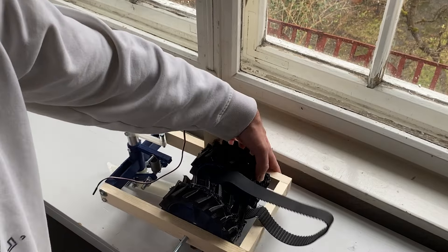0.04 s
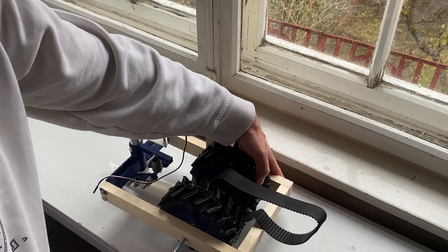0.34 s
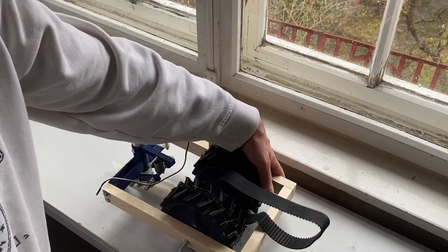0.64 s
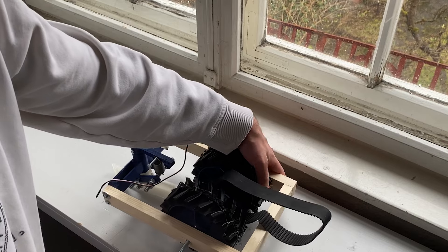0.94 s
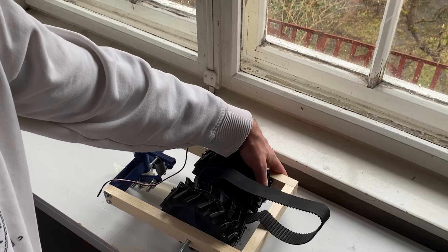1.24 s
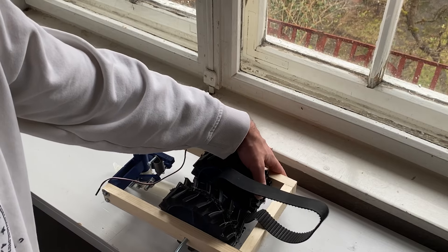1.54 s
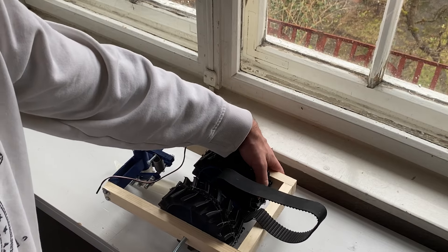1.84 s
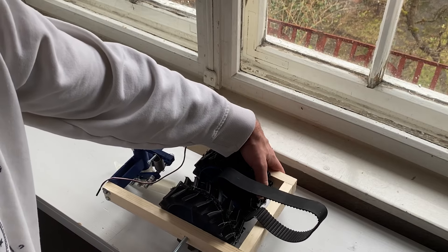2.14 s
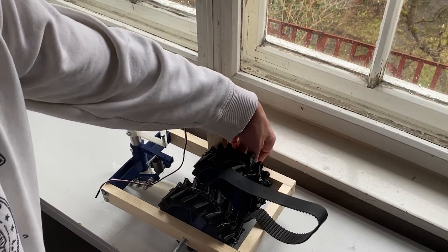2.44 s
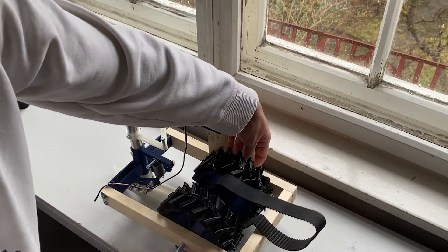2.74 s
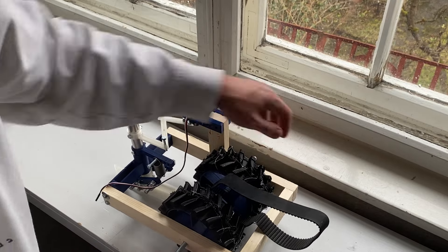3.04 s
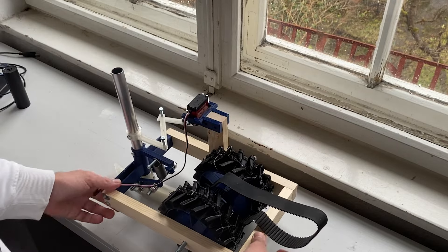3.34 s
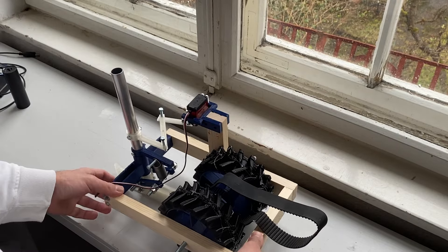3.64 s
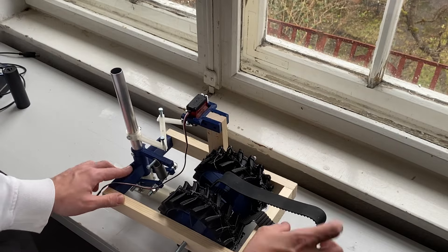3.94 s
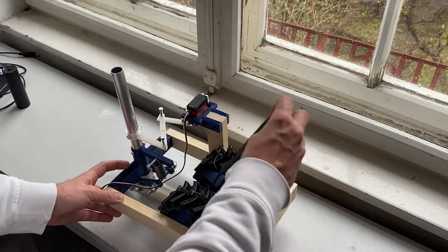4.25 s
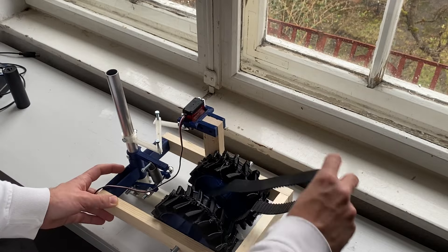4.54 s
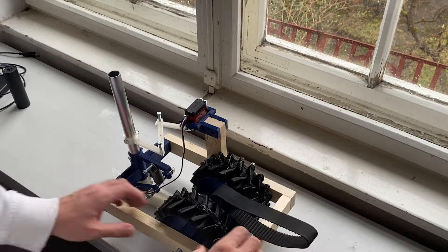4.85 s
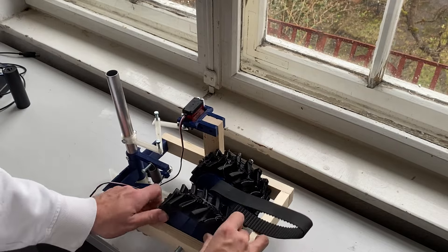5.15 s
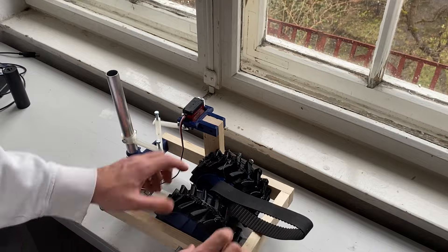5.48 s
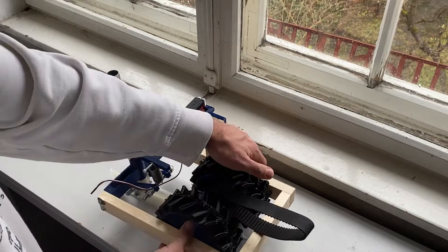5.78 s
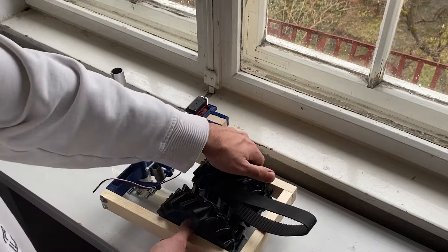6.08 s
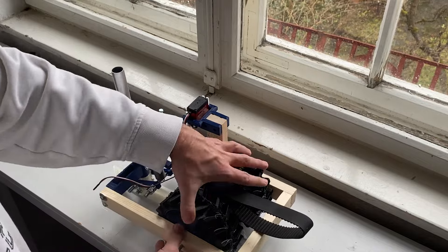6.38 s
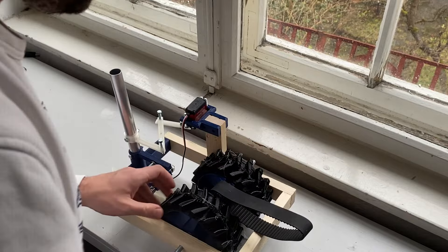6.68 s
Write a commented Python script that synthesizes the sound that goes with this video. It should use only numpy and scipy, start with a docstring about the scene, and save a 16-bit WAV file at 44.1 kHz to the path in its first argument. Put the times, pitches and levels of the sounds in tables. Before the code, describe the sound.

Plastic paddle wheels are handled in a wooden frame, heard close in a quiet room with a faint low rumble. For the first two seconds there are light, irregular clicks, knocks and brief rubs. At about 2 seconds a wheel is dragged against the wood in a rough scrape, ending in two knocks at 2.3 seconds. It snaps free with a loud, sharp clack at 2.5 seconds and rubs again near 2.9. A quieter stretch holds soft bumps and a faint sleeve brush. From 4.2 to 4.8 seconds a rubber belt is lifted and dropped with light taps, and tiny, faint high squeaks come and go until 6 seconds. Firm knocks land at 5.2 and 5.8 seconds, then a loud, duller rub at 5.9. Cloth swishes softly while a few more rubs and clicks fade out by about 6.8 seconds.

```python
"""Plastic paddles rub and knock on a wooden frame as hands work two paddle wheels on a table.
One wheel is dragged round in a long scrape and snaps free, a toothed rubber belt is lifted and
dropped, rubber and skin squeak on plastic, and a sleeve brushes past in the quiet room.
Blows and stick-slip friction all ring the same modes of wheels and frame, coloured by the spot
touched. Squeaks, sleeve and room are shaped noise."""
import sys
import numpy as np
from scipy import signal
from scipy.io import wavfile

SR = 44100
rng = np.random.default_rng(int(sys.argv[2]) if len(sys.argv) > 2 else 0)


def to_wav(s):
    """Save 16-bit WAV."""
    ch = np.atleast_2d(s).T  # columns
    pcm = np.round(np.clip(ch, -1, 1) * 32767)  # PCM
    wavfile.write(sys.argv[1], SR, pcm.astype(np.int16))


N = 300585
TIME = np.arange(N) / SR
TAIL = int(.3 * SR)
RING_TIME = np.arange(TAIL) / SR
EDGES_HZ = np.geomspace(22, 17000, 20)
CENTRES_HZ = np.sqrt(EDGES_HZ[1:] * EDGES_HZ[:-1])


def from_db(db):
    """Decibels to gain."""
    return 10 ** (np.asarray(db) / 20)


def unit_energy(x):
    """Scale to a mean energy of one per channel."""
    return x / np.sqrt(np.mean(np.sum(x ** 2, axis=-1)) + 1e-30)


def at_hz(points, hz):
    """Interpolate a curve on a log-frequency axis."""
    f, value = np.transpose(points)
    return np.interp(np.log(hz), np.log(f), value)


def decay(t, t60):
    """Fall of 60 dB in t60 seconds, 1 ms at the shortest."""
    return np.exp(-np.log(1000) * t / max(t60, 1e-3))


def panned(db):
    """Stereo gains for a level of left over right."""
    return from_db([[db / 2], [-db / 2]])


def add(out, start_s, sound):
    """Mix in a stereo sound."""
    i = max(int(start_s * SR), 0)
    out[:, i:i + sound.shape[1]] += sound[:, :N - i]


def resonate(x, hz, width_hz):
    """Two-pole resonance with a peak gain of one."""
    r = np.exp(-np.pi * width_hz / SR)
    feedback = [1, -2 * r * np.cos(2 * np.pi * hz / SR), r * r]
    return signal.lfilter(np.array([1, 0, -1]) * (1 - r * r) / 2, feedback, x)


def swells(rows):
    """Sum of bell-shaped envelopes."""
    return sum(from_db(db) * np.exp(-np.minimum((2 * (TIME - centre_s) / width_s) ** 2, 50))
               for centre_s, width_s, db in rows)


# Stereo image. Each row: frequency in Hz, left-right correlation.
CORRELATION = [(100, .99), (500, .96), (1000, .62), (2000, .45), (4000, .62), (8000, .74), (15000, .66)]

def noise_bands():
    """Half-octave bands of stereo noise, nearly mono in the bass."""
    white, bands = rng.standard_normal((2, 2, N)), []
    for k, hz in enumerate(CENTRES_HZ):
        bandpass = signal.butter(2, EDGES_HZ[k:k + 2], "band", fs=SR, output="sos")
        mid, side = signal.sosfilt(bandpass, white[k % 2])
        alike = at_hz(CORRELATION, hz)
        bands.append(np.sqrt(1 + alike) * mid + np.sqrt(1 - alike) * side * [[1], [-1]])
    return np.array(bands)


def coloured_noise(bands, spectrum):
    """Steady noise of a given spectrum, rms one."""
    gains = from_db(at_hz(spectrum, CENTRES_HZ))
    return unit_energy(np.tensordot(gains, bands, 1)) * np.sqrt(N)


# Room noise spectra. Each row: frequency in Hz, relative density in dB.
RUMBLE_SPECTRUM = [(26, -28), (52, -31), (82, -30), (122, -12), (166, 8.5), (255, -8), (410, -5),
                   (610, -26), (1210, -48.5)]
RUSTLE_SPECTRUM = [(260, -19.5), (510, 7.5), (910, 6), (1510, 2), (2510, -8), (4010, -13), (8010, -43)]
# Frame shifting on the table. Each row: centre in seconds, width in seconds, level in dB.
FRAME_SHIFTS = [(1.6, .08, -62), (2.9, 1.7, -77.5), (6.2, 0.22, -71)]

def room(bands, rumble_db=-71.5, rustle_db=-78.5, rumble_pan_db=-1.3):
    """A faint steady rustle over a low rumble that swells as the frame shifts."""
    envelope = from_db(rumble_db) + swells(FRAME_SHIFTS)
    rumble = envelope * coloured_noise(bands, RUMBLE_SPECTRUM) * panned(rumble_pan_db)
    return rumble + from_db(rustle_db) * coloured_noise(bands, RUSTLE_SPECTRUM)


# Cloth spectrum. Each row: frequency in Hz, relative density in dB.
SLEEVE_SPECTRUM = [(1600, -15.5), (3100, -7), (6400, -0.5), (9100, -2), (12100, -3.5), (14100, -27),
                   (15900, -21.5)]
# Sleeve passes. Each row: centre in seconds, width in seconds, level in dB.
SLEEVE_SWEEPS = [(1.42, 0.58, -82.5), (3.346, .1, -70), (4.47, 0.19, -90), (5.47, 0.14, -81.5),
                 (5.76, 0.19, -77), (6.09, 0.12, -78.5), (6.64, 0.18, -82)]

def sleeve(bands, floor_db=-91.0):
    """Cloth brushes past in swells of a faint steady hiss."""
    return (from_db(floor_db) + swells(SLEEVE_SWEEPS)) * coloured_noise(bands, SLEEVE_SPECTRUM)


# Squeak resonances. Each row: frequency in Hz, relative level in dB.
SQUEAK_TONES = [(7750, 9), (4830, 0)]
# Squeaks. Each row: centre in seconds, width in seconds, gain in dB.
SQUEAKS = [(4.757, 0.033, -70.5), (4.79, 0.035, -72.5), (4.96, 0.053, -80), (5.025, 0.019, -73.5),
           (5.246, .016, -74.5), (5.51, 0.033, -79.5), (6.037, 0.018, -71.5)]

def squeaks(width_hz=850, hiss_db=4.0, hiss_from_hz=4000):
    """Rubber and skin squeak thinly on smooth plastic, with a hiss of sliding."""
    slip = rng.standard_normal((2, N))
    whistle = sum(from_db(db) * unit_energy(resonate(resonate(slip, hz, width_hz), hz, width_hz))
                  for hz, db in SQUEAK_TONES)
    highpass = signal.butter(2, hiss_from_hz, "high", fs=SR, output="sos")
    hiss = unit_energy(signal.sosfilt(highpass, slip))
    return swells(SQUEAKS) * (whistle + from_db(hiss_db) * hiss) * np.sqrt(N)


# Modes of wheels and frame. Each row: frequency in Hz, relative energy in dB, t60 in seconds.
BODY_MODES = [(168.1, -2, .19), (214.2, 0, 0.14), (287, -3.5, 0.19), (358.3, -6.5, 0.12), (416, 2.5, 0.063),
              (741, 1, 0.097), (836.5, -1, .085), (902.3, 3, 0.084), (1012, 0.5, 0.035),
              (1280, -3.5, 0.063), (1171, -14, 0.031), (1396, 3.5, 0.092), (1592, 1.5, 0.025),
              (1778, -0.5, 0.058), (1957.6, -12.5, 0.16), (2160, -9.5, .085), (2125, -4.5, .055),
              (3390, -1, 0.011), (3745, -7, 0.05), (3900, -5, 0.017), (4077, 0, 0.039), (4813, -2, 0.029),
              (4576, -6.5, .055), (5600, -15.5, .045), (7550, -9, 0.047)]
# Dense weak modes and close reflections. Each row: frequency in Hz, relative density in dB.
DIFFUSE_SPECTRUM = [(81, -26), (161, 2), (301, 5), (551, -16.5), (901, 5.5), (1801, -0.5), (2701, -3),
                    (4501, -2), (7001, -4.5), (11001, 0), (15001, -1)]
# Their decay. Each row: frequency in Hz, t60 in seconds.
DIFFUSE_T60 = [(110, 0.19), (410, 0.49), (1100, 0.033), (2900, 0.098), (7100, 0.048), (14000, 0.017)]

def body_responses(bands, count=24, crack_db=-3.0, crack_t60=0.0091, scatter_db=2.5,
                   room_db=-27, room_t60=.28):
    """Impulse responses at random points of the assembly: clear modes, a diffuse ring and a crack."""
    t, responses = RING_TIME, []
    hz, mode_db, _ = np.transpose(BODY_MODES)
    modes = np.array([unit_energy(decay(t, t60)) * np.exp(2j * np.pi * f * t)
                      for f, _, t60 in BODY_MODES])
    room_tail = from_db(room_db) * decay(t, room_t60)
    envelopes = np.array([unit_energy(decay(t, at_hz(DIFFUSE_T60, f)) + room_tail) for f in CENTRES_HZ])
    colour = from_db(at_hz(DIFFUSE_SPECTRUM, CENTRES_HZ))
    spread_rad = np.arccos(at_hz(CORRELATION, hz)) / 2   # higher modes reach the sides out of phase
    for _ in range(count):
        i = rng.integers(TAIL, N - TAIL)
        noise = bands[:, :, i:i + TAIL]
        diffuse = unit_energy(np.einsum("bct,bt->ct", noise, envelopes * colour[:, None]))
        crack = unit_energy(np.tensordot(colour, noise, 1) * decay(t, crack_t60))
        phase = rng.uniform(0, 2 * np.pi, len(hz))
        phase = phase + spread_rad * rng.choice([-1, 1], len(hz)) * [[1], [-1]]
        gains = from_db(mode_db + scatter_db * rng.standard_normal(len(hz)))
        ring = unit_energy(((gains * np.exp(1j * phase)) @ modes).real)
        responses.append(ring + diffuse + from_db(crack_db) * crack)
    return np.array(responses)


# Registers: thud (frame and table), clack (paddles), tick (their edges), fizz (surface grain).
# Each row: lower edge in Hz, upper edge in Hz.
REGISTERS_HZ = [(90, 550), (550, 2200), (2200, 7000), (7000, 16000)]
# Each entry: left over right in dB for one register.
REGISTER_PANS_DB = [-1.3, -.8, -.5, 2.5]
# Contact spots. Each row: frame resonance in Hz, paddle resonance in Hz, gain of both in dB,
# grip t60 for a knock in seconds, thud over clack in dB, fizz over tick in dB.
SPOTS = {"tip": (219.5, 1679.5, 2.5, .15, -16, -6.5), "rim": (279, 849, 14.5, 2.3, -13.5, -8.5),
         "paddle": (214.5, 970, 2, 1.7, -9, -7), "wheel": (233, 900.5, 3.5, 1.5, -3.5, -7.5),
         "hub": (213.5, 960, 2, 8, 1.5, -9), "frame": (179.5, 786, 6.5, 2, 12, 1.5),
         "rail": (390, 1264, 6, .11, 3, -9), "bracket": (495, 610, 7, -0.1, 12.5, 6),
         "belt": (340, 1400, 2.5, 1, -7.5, -14), "axle": (352, 1005, 5.5, 3.3, -11.5, -12)}

def contact(ring, length_s, level_db, hardness_db, spot, corner_hz=16020, db_per_octave=8):
    """Colour a ring by spot. Level sets the clack; hardness sets tick over clack and the treble corner."""
    frame_hz, paddle_hz, resonance_db, _, thud_db, fizz_db = SPOTS[spot]
    pole = np.exp(-2 * np.pi * corner_hz * 2 ** (hardness_db / db_per_octave) / SR)
    ring = signal.lfilter([1 - pole], [1, -pole], ring + 1e-18)
    resonances = resonate(ring, frame_hz, width_hz=63) + resonate(ring, paddle_hz, width_hz=110)
    ring = ring + from_db(resonance_db) * resonances
    levels_db = level_db + np.array([thud_db, 0, hardness_db, hardness_db + fizz_db])
    sound = 0
    for db, pan_db, band_hz in zip(levels_db, REGISTER_PANS_DB, REGISTERS_HZ):
        bandpass = signal.butter(4, band_hz, "band", fs=SR, output="sos")
        sound += from_db(db) * panned(pan_db) * unit_energy(signal.sosfilt(bandpass, ring))
    return np.sqrt(length_s * SR) * sound   # levels are rms over length_s


def grip(spot, looseness=1):
    """A hand on the part cuts its ring short."""
    return decay(RING_TIME, looseness * SPOTS[spot][3])


def stroke_time(length_s):
    """Time axis of one stroke, 10 ms at the shortest."""
    return np.arange(int(np.clip(length_s * SR, SR / 100, TAIL))) / SR


def friction(pressure_db, slips_per_s=2300, uneven_db=2.0):
    """Stick and slip: tiny uneven jerks whose size follows the pressure."""
    chance, size, sign = rng.random((3, TAIL))[:, :len(pressure_db)]
    size_db = uneven_db * np.minimum(-np.log(1 - size), np.e)
    jerks = from_db(size_db) * np.sign(sign - .5)
    return jerks * (chance < slips_per_s / SR) * from_db(pressure_db)


def sliding(responses, force):
    """The contact crosses three random points, so the ring changes as it goes."""
    points = rng.permutation(len(responses))[:3]
    position = np.linspace(0, 2, len(force))
    shares = [np.sqrt(np.maximum(1 - np.abs(position - k), 0)) for k in range(3)]
    return sum(signal.fftconvolve(responses[point], (force * share)[None])
               for point, share in zip(points, shares))


# Blows. Each row: start in seconds, level in dB, hardness in dB, spot.
KNOCKS = [(0.131, -63, -6.5, "rim"), (0.237, -62, -10.5, "paddle"), (0.373, -50, -17, "tip"),
          (0.655, -76, 1, "wheel"), (0.679, -63, -5, "paddle"), (0.748, -78, 2, "belt"),
          (0.771, -65.5, -6.5, "paddle"), (0.856, -83, 4.5, "paddle"), (1.066, -79, -0.5, "paddle"),
          (1.196, -54, -25, "wheel"), (1.504, -54.5, -6.5, "hub"), (1.98, -68.5, 6, "hub"),
          (2.3, -46, 0, "paddle"), (2.313, -47, 1, "hub"), (2.553, -39.5, 5, "tip"),
          (2.674, -67, -3.5, "hub"), (3.074, -77.5, -19, "frame"), (3.19, -77.5, -20, "frame"),
          (3.712, -62, -36, "frame"), (4.162, -66.5, -12.5, "belt"), (4.242, -69, -5.5, "belt"),
          (4.282, -58, -3.5, "belt"), (4.316, -56, -4.5, "belt"), (4.396, -58, 0, "belt"),
          (4.564, -63.5, -2.5, "tip"), (5.169, -42.5, -9.5, "axle"), (5.322, -67, -11, "hub"),
          (5.79, -45, -10, "axle"), (6.448, -60, 4, "tip"), (6.457, -58.5, -7, "paddle"),
          (6.499, -70.5, -7, "belt"), (6.557, -68.5, -16.5, "bracket"), (6.667, -75, -7, "frame"),
          (6.778, -73, -22, "bracket")]

def knocks(responses, chatter_s=.016, chatter_db=-8.0, settled_db=-29.5):
    """Single blows with a brief chatter as the parts settle."""
    out = np.zeros((2, N))
    pressure_db = np.interp(stroke_time(chatter_s), [0, chatter_s], [chatter_db, settled_db])
    for k, (start_s, level_db, hardness_db, spot) in enumerate(KNOCKS):
        force = friction(pressure_db)
        force[0] = 1   # the blow itself
        ring = signal.fftconvolve(responses[k % len(responses)] * grip(spot), force[None])
        add(out, start_s, contact(ring, .03, level_db, hardness_db, spot))
    return out


# Short slides. Each row: start, rise and fall in seconds, level in dB, hardness in dB, spot.
RUBS = [(0.063, 0.039, .03, -56.5, -20, "paddle"), (0.247, 0.014, .007, -58, -3, "wheel"),
        (0.346, 0.022, 0.022, -56, 1, "tip"), (0.421, 0.0012, 0.093, -69, 0, "wheel"),
        (0.52, 0.034, 0.02, -64.5, -10, "hub"), (0.676, 0.0071, 0.025, -57, -10, "hub"),
        (0.851, 0.038, 0.0061, -68, -14.5, "wheel"), (1.089, 0.015, 0.043, -70, -9.5, "hub"),
        (1.199, 0.0037, 0.025, -50, -25.5, "wheel"), (1.28, 0.021, 0.0097, -62, -14.5, "hub"),
        (1.358, 0.0043, 0.016, -73, 5, "paddle"), (1.368, 0.031, 0.027, -62, -12.5, "wheel"),
        (1.46, .054, 0.023, -58, -12.5, "rim"), (1.578, .011, .026, -47, -6.5, "hub"),
        (1.742, 0.0042, 0.025, -56.5, -3, "wheel"), (1.795, .018, 0.035, -55.5, 2, "hub"),
        (1.948, .002, 0.023, -66, 4.5, "wheel"), (2.33, 0.0054, 0.021, -54.5, -9, "hub"),
        (2.428, 0.0051, 0.045, -57, -13, "paddle"), (2.492, .012, 0.017, -57.5, -15, "paddle"),
        (2.523, 0.015, 0.025, -35, 0, "tip"), (2.7, 0.016, 0.067, -58.5, -16.5, "wheel"),
        (2.83, 0.013, 0.015, -72, -2, "paddle"), (2.857, 0.011, 0.056, -56.5, 1, "wheel"),
        (2.893, 0.026, .029, -44.5, -5.5, "wheel"), (3.358, 0.037, 0.018, -59, -16, "wheel"),
        (3.519, 0.0058, 0.016, -56, -39, "paddle"), (3.573, 0.0082, 0.029, -65.5, -35, "hub"),
        (3.63, 0.023, .04, -77, -33, "frame"), (3.982, .012, .011, -50.5, -22, "rail"),
        (4.201, 0.0079, 0.036, -66, -19, "wheel"), (4.341, 0.062, 0.035, -67.5, -6.5, "belt"),
        (4.535, .033, 0.0087, -60, -26, "paddle"), (4.629, .01, 0.035, -58.5, -14.5, "wheel"),
        (4.7, .014, 0.016, -61.5, -3, "tip"), (4.735, 0.0062, 0.063, -60, -5.5, "belt"),
        (5.049, 0.061, 0.014, -53, -8, "paddle"), (5.188, 0.018, 0.015, -53, -14, "wheel"),
        (5.524, 0.0037, 0.024, -56, -22.5, "rail"), (5.686, 0.0084, 0.021, -72, -0.5, "frame"),
        (5.832, .01, 0.016, -61, -7, "wheel"), (5.858, .003, 0.044, -48.5, -19, "rim"),
        (5.883, .006, .022, -34.5, -21.5, "rim"), (5.965, .033, 0.021, -48.5, -15, "paddle"),
        (6.131, 0.025, 0.044, -56, -12, "paddle"), (6.214, 0.028, 0.014, -56.5, -14.5, "paddle"),
        (6.433, 0.021, 0.025, -50, -14, "paddle")]

def rubs(responses, graze_share=.4, graze_db=-41.0, light_db=-13.0):
    """Paddles and fingers graze the surface, then slide briefly, pressing harder and letting go."""
    out = np.zeros((2, N))
    for start_s, rise_s, fall_s, level_db, hardness_db, spot in RUBS:
        graze_s, length_s = graze_share * rise_s, rise_s + fall_s
        t = stroke_time(graze_s + length_s) - graze_s
        pressure_db = np.interp(t, [-graze_s, 0, rise_s, length_s], [graze_db, light_db, 0, light_db])
        ring = sliding(responses * grip(spot, looseness=3.3), friction(pressure_db))
        add(out, start_s - graze_s, contact(ring, length_s, level_db, hardness_db, spot))
    return out


# The long scrape, paddle after paddle.
# Each row: start, length and rise in seconds, level in dB, hardness in dB, spot.
SCRAPE_STROKES = [(1.975, 0.2, 0.054, -47, 0.5, "wheel"), (2.174, .162, 0.0059, -43, -1, "paddle")]

def scrape(responses, light_db=-10.0, bite_db=3.5, release_s=0.012,
           waver_db=1.5, wavers_per_s=45, grip_t60=0.49):
    """A wheel is dragged round: each paddle bites the wood, eases off unevenly and slips free."""
    out = np.zeros((2, N))
    damped = responses * decay(RING_TIME, grip_t60)
    for start_s, length_s, rise_s, level_db, hardness_db, spot in SCRAPE_STROKES:
        t, waver = stroke_time(length_s), rng.standard_normal(32)
        corners_s = [0, rise_s, length_s - release_s, length_s]
        pressure_db = np.interp(t, corners_s, [light_db, bite_db, 0, light_db])
        pressure_db += waver_db * np.interp(t * wavers_per_s, np.arange(len(waver)), waver)
        ring = sliding(damped, friction(pressure_db, slips_per_s=4600, uneven_db=6.0))
        add(out, start_s, contact(ring, length_s, level_db, hardness_db, spot))
    return out


def scene():
    """Contacts on one shared assembly, over squeaks, sleeve and room."""
    bands = noise_bands()
    responses = body_responses(bands)
    contacts = knocks(responses) + rubs(responses) + scrape(responses)
    return contacts + squeaks() + sleeve(bands) + room(bands)


def record(dry, low_cut_hz=62, high_cut_hz=15900):
    """The microphone drops the deep bass; the top is cut steeply."""
    dry = signal.sosfilt(signal.butter(2, low_cut_hz, "high", fs=SR, output="sos"), dry)
    return signal.sosfilt(signal.ellip(10, .2, 80, high_cut_hz, fs=SR, output="sos"), dry)


dry = scene()
out = record(dry)
to_wav(out)
```